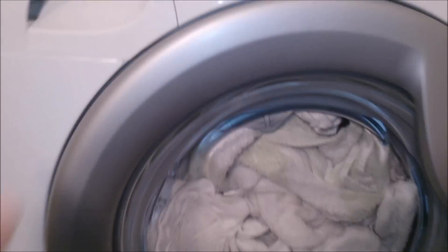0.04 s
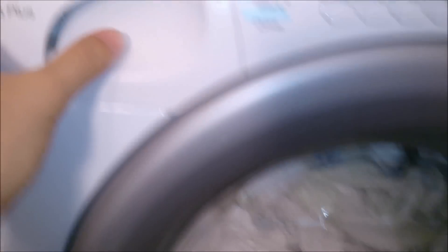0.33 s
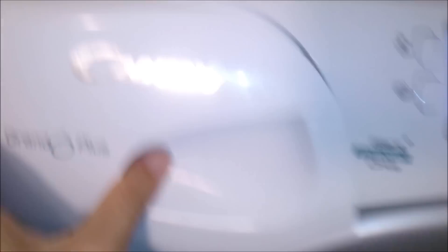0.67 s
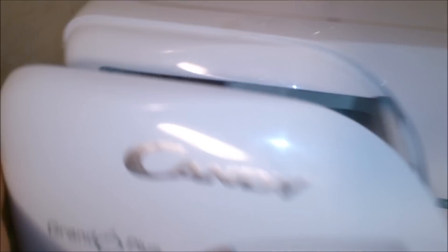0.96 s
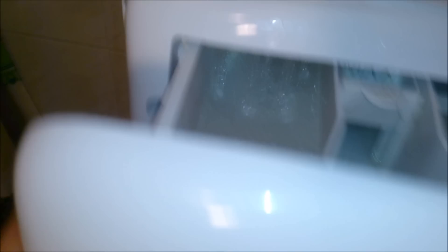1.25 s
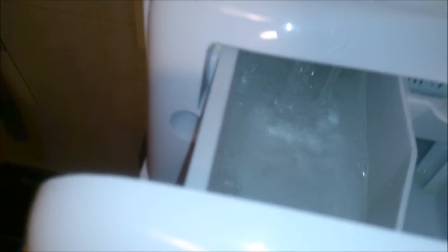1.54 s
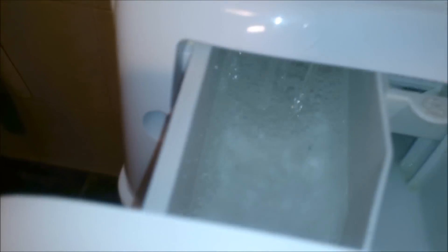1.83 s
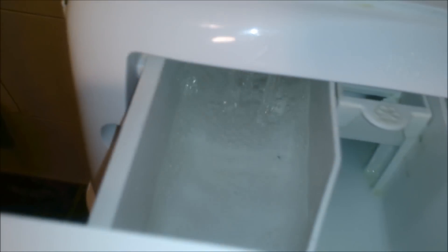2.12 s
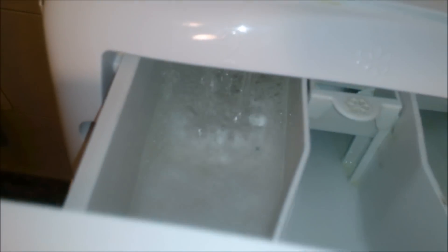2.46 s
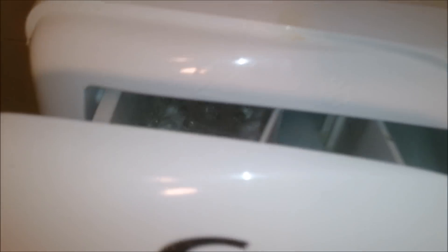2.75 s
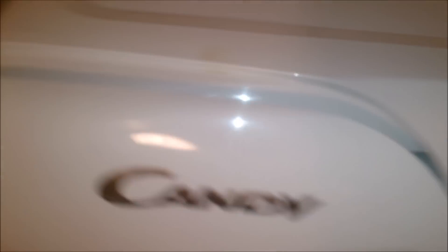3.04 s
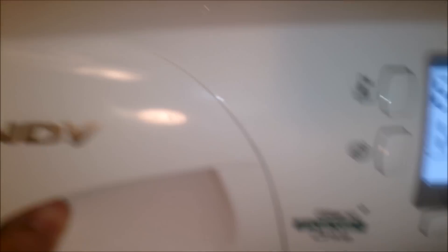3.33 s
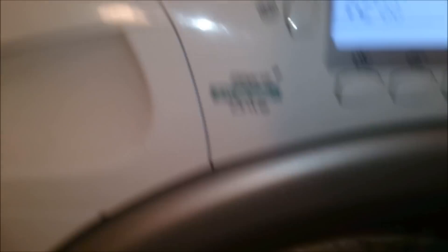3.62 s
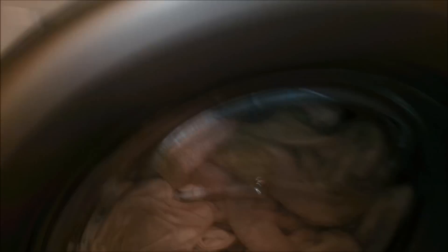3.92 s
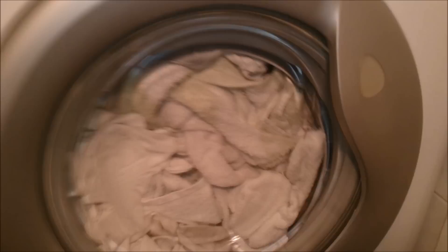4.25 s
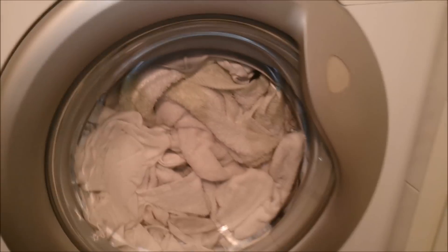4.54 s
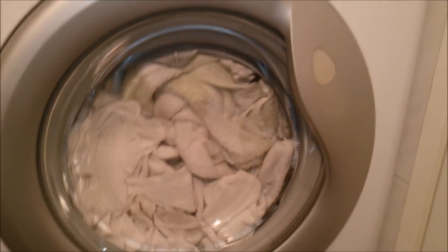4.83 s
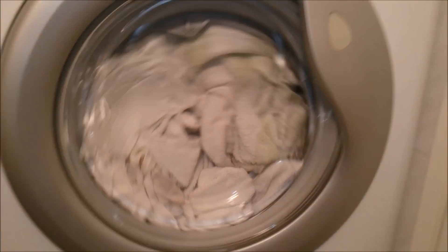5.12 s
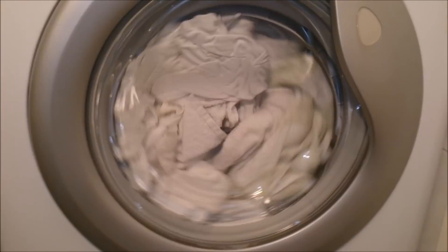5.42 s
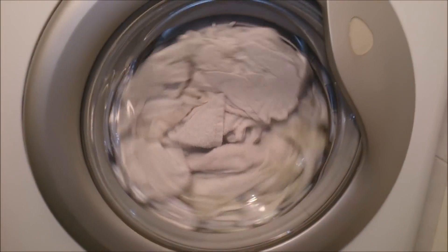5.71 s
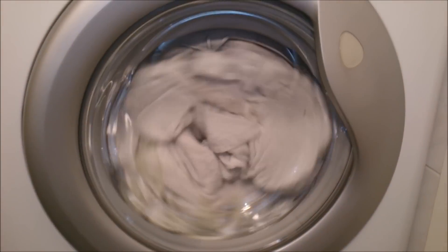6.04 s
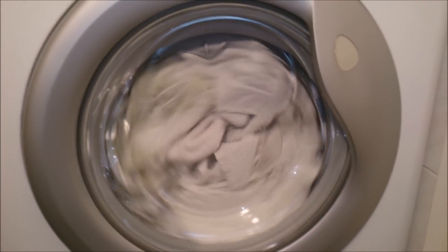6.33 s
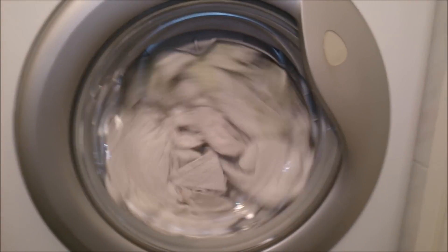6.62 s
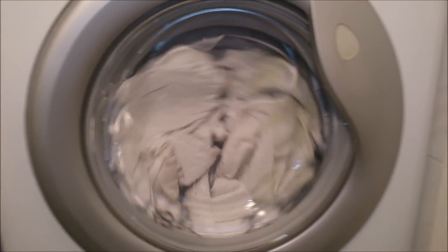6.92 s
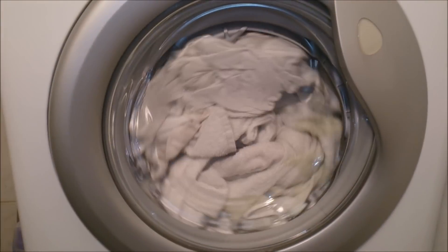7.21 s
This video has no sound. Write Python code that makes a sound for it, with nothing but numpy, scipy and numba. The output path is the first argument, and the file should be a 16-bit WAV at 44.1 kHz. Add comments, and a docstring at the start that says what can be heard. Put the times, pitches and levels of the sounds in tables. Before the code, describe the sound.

Close by in a small tiled room, water rushes into a washing machine over a faint hum. The plastic detergent drawer scrapes open, and the jets become a bright hiss, splashing and gurgling in the tray. The drawer slides back and shuts with a sharp clack. The water then cuts off with a knock in the pipe, a few drops fall, and wet laundry tumbles very quietly with soft thumps and sloshes.

```python
"""Water rushes behind a washing machine's front panel, over a faint valve hum, close by in a small tiled room.
The detergent drawer scrapes open: jets spatter on plastic and churn the pool until it shuts with a clack.
The inlet valve closes, the stopped water knocks the pipe, and the last drops plink and drain away.
Then the drum tumbles wet laundry, which rumbles, thumps the panels and spills water into the tub."""
import sys
import numpy as np
from scipy import signal
from scipy.fft import rfft, irfft, next_fast_len
from scipy.io import wavfile
from scipy.ndimage import uniform_filter1d
from numba import njit

SR = 44100
rng = np.random.default_rng(int(sys.argv[2]) if len(sys.argv) > 2 else 0)


def digitize_waveform(pressure):
    """Quantize a signal to 16-bit integers and store it at the path in sys.argv[1].

    Rows of a 2-D input are taken as channels; values are limited to [-1, 1].
    """
    field = np.atleast_2d(pressure).T
    bounded = np.clip(field, -1, 1)
    quanta = np.round(bounded * 32767).astype(np.int16)
    wavfile.write(sys.argv[1], SR, quanta)


N = 329427
T = np.arange(N) / SR
HZ = np.fft.rfftfreq(2 * N, 1 / SR) + .001
TOP_HZ = 15800
PAN_SHUT_DB, PAN_OPEN_DB, PAN_DRUM_DB = -2.5, 2.5, -3  # left minus right
PLUNGE_START_S, PLUNGE_END_S, PLUNGE_RAMP_S = 1.968, 2.715, 0.045


def open_drawer():
    """Water heard through the drawer gap; near full travel the jets plunge straight into the pool."""
    gap = opening()
    plunge = ramp(PLUNGE_START_S, PLUNGE_RAMP_S) - ramp(PLUNGE_END_S - PLUNGE_RAMP_S, PLUNGE_RAMP_S)
    # treble needs a wide gap, bass does not
    water = spray() * gap ** 1.034 + sizzle(plunge) * gap ** 2.7
    water += splash(gap, plunge) * gap ** .35 + gurgle() * gap ** 0.23
    water += crater() * plunge
    return water * sides(undb(PAN_SHUT_DB + (PAN_OPEN_DB - PAN_SHUT_DB) * gap))


# Drawer path. Each row: time in seconds, share of full travel.
DRAWER_TRAVEL = [(.75, 0), (.88, 0.34), (1.15, 0.43), (1.48, 0.76), (2.03, 0.97), (2.64, 0.93),
                 (2.86, 0.64), (3.25, 0.32), (3.45, 0.18)]

def opening():
    """How far the hand has drawn the drawer out, 0 to 1."""
    times_s, travel = np.transpose(DRAWER_TRAVEL)
    return np.interp(T, times_s, travel) * (T > times_s[0]) * (T < times_s[-1])


# Spray spectrum. Each row: frequency in Hz, gain in dB.
SPRAY_SPECTRUM = [(1060, -33), (1800, -3.5), (2470, -2.5), (2680, -1.5), (4120, -4), (5210, -1),
                  (6180, -1.5), (6950, 3), (8320, -2), (10600, -6), (15500, -20)]
# Spray and sizzle balance. Each row: frequency in Hz, left minus right in dB.
SPRAY_PAN = [(4000, 2), (7200, 2.5), (8500, 2), (11000, 8.5), (15000, 12)]

def spray():
    """Jets spatter on the plastic tray."""
    spatter = drops(per_s=7000, spread_db=1.5)
    spatter += undb(-12.5) * bubbles(4000, 10000, cycles=47, count=5000)
    spatter = room(spatter, wet_db=-2.5, t60_s=0.12)
    hiss = unit(filtered(spatter, shape(SPRAY_SPECTRUM) * sides(shape(SPRAY_PAN))))
    return hiss * undb(-33.5 + walk(per_s=25))


# Finest bubbles. Each row: centre in Hz, width in Hz, gain in dB.
SIZZLE_BAND = [(10070, 2400, 0)]

def sizzle(plunge, foam_lag_s=.012):
    """Fine bubbles burst in the pool; foam builds and collapses more slowly than the plunge."""
    fizz = bubbles(8000, 14000, cycles=38, count=9000)
    fizz = unit(filtered(fizz, resonances(SIZZLE_BAND) * sides(shape(SPRAY_PAN))))
    foam = uniform_filter1d(plunge, int(2 * foam_lag_s * SR))
    return fizz * undb(-47.5 + 9.5 * foam + 3.1 * walk(per_s=30))


# Water-loaded tray. Each row: centre in Hz, width in Hz, gain in dB.
TRAY_MODES = [(663, 6.7, -2.5), (960, 64.3, -10.5), (1090, 83, -12.5), (1250, 84, -13), (1449, 64, 0)]

def splash(gap, plunge):
    """The churning pool rings the tray and its air, whose pitch rises as the tray slides in."""
    churn = drops(per_s=7000, spread_db=2)
    churn = ports(churn + undb(-14.5) * bubbles(496, 2000, cycles=28, count=2500))
    air_hz = 849 + 169.7 * (1 - gap)
    air = np.array([moving_band(side, air_hz, width_hz=48.4) for side in churn])
    ring = unit(undb(2.5) * air + filtered(churn, resonances(TRAY_MODES)))
    return ring * undb(-42 + 6.5 * plunge + 1.5 * walk(per_s=14))


# Low resonances of the pool. Each row: centre in Hz, width in Hz, gain in dB.
POOL_MODES = [(291, 33, 0.5), (356, 17, 3.5), (439, 39, 6.5), (570, 20, -4.5)]
# Gulps as the drawer jerks. Each row: time in seconds, boost in dB.
POOL_GULPS = [(1.874, 10.5), (3.14, 11)]

def gurgle():
    """The pool rings hollowly and swells briefly at each gulp."""
    hollow = resonances(POOL_MODES) * shape([(190, -19.5), (280, 6.5), (600, -3.5), (1500, -15)])
    gulps_db = sum(db * swell(s, width_s=0.014) for s, db in POOL_GULPS)
    ring = unit(filtered(ports(drops(per_s=2500, spread_db=2)), hollow))
    return ring * undb(-45.5 + gulps_db + 2.5 * walk(per_s=12))


# Air dragged under by the jets. Each row: centre in Hz, width in Hz, gain in dB.
CRATER_AIR_MODES = [(863.5, 22, 9), (1100, 57, 3.5), (1234, 110, -5), (1485, 70, -3)]

def crater():
    """The jets dig a hollow in the pool; its air rings, wobbling in pitch and louder as it deepens."""
    churn = ports(drops(per_s=3000, spread_db=2))
    ring = 0
    for hz, width_hz, db in CRATER_AIR_MODES:
        pitch_hz = hz * (1 + 0.011 * walk(per_s=22))
        ring += undb(db) * np.array([moving_band(side, pitch_hz, float(width_hz)) for side in churn])
    return unit(ring) * undb(-35 - 1.5 * (2 - ramp(PLUNGE_START_S, 0.42)))


# Rush through the dispenser housing. Each row: frequency in Hz, gain in dB.
HOUSING_SPECTRUM = [(35, -40), (60, -9.5), (96, -3.5), (129, -9.5), (248, -6.5), (327, -8.5), (829, -6),
                    (999, -12.5), (1150, -7.5), (2250, -11), (2650, -12), (5450, -16), (7200, -16),
                    (10400, -17), (15500, -32)]
# Housing resonances. Each row: centre in Hz, width in Hz, gain in dB.
HOUSING_PEAKS = [(835, 87, -0.5), (1178, 464, -5.5), (2710, 210, -3.5), (3212, 540, -5.5),
                 (7000, 460, -4.5)]
# Housing balance. Each row: frequency in Hz, left minus right in dB.
HOUSING_PAN = [(100, -7), (700, 0.5), (3000, -3), (8000, -0.5), (12000, 0)]
VALVE_S, SQUEEZE_S, SHUT_S, EMPTYING_DB_PER_S = 4.15, 0.015, 0.13, 42.5

def inlet():
    """Jets drum inside the dispenser; the valve coil hums at twice the mains rate until it lets go."""
    # the valve closes: a short hiss, a quick drop, then the hose runs empty
    squeeze, shut = ramp(VALVE_S - SQUEEZE_S, SQUEEZE_S), ramp(VALVE_S, SHUT_S)
    closing_db = 5 * (squeeze - shut) - 15.5 * shut - EMPTYING_DB_PER_S * since(VALVE_S + SHUT_S)
    flow_db = -44 + 2.5 * np.sqrt(opening()) + closing_db
    colour = shape(HOUSING_SPECTRUM) * (1 + resonances(HOUSING_PEAKS)) * sides(shape(HOUSING_PAN))
    rush = unit(filtered(ports(drops(per_s=16000, spread_db=0.5)), colour))
    hum = sine(100) * undb(-55 + 1.3 * walk(per_s=5)) * (1 - squeeze)
    return rush * undb(flow_db + 0.5 * walk(per_s=16)) + hum * undb([[-1.8], [1.8]])


# Handle, latch and valve. Each row: start in seconds, level in dB, relative panel ping in dB.
PLASTIC_CLICKS = [(0.514, -28, -1), (3.4463, -13.5, -2.5), (3.4498, -5.5, 1), (3.4508, -10.5, -2),
                  (3.4541, -14, -0.5), (4.149, -32, 0), (4.437, -53, -14)]
# Crack of hard plastic. Each row: frequency in Hz, gain in dB.
CLICK_SPECTRUM = [(300, -8), (1300, -3), (2100, -1), (3000, 1), (3800, -5.5), (5000, -2.5), (7300, -7),
                  (11000, -12), (15500, -24)]

def clicks():
    """Plastic snaps against plastic: a crack, a short ping of the front panel, and the room's echo."""
    out = np.zeros((2, N))
    grit = unit(filtered(ports(noise()), shape(CLICK_SPECTRUM)))
    walls = shape([(1000, -0.5), (3000, -2), (7000, -1), (13000, -10)])
    echo = unit(filtered(ports(noise()), shape(CLICK_SPECTRUM) * walls))
    ping = sine(3050, SR) * fade(0.0099)
    give = 1 - fade(.005)  # plastic yields a little before it snaps
    for k, (s, db, ping_db) in enumerate(PLASTIC_CLICKS):
        crack = undb(-4) * stretch(grit, k) * fade(0.018)
        tail = undb(-16) * stretch(echo, k) * fade(0.29)
        add(out, s, undb(db) * (crack + undb(ping_db) * ping + tail) * give)
    return out * undb([[-.3], [.3]])


# Cabinet panels. Each row: pitch in Hz, gain in dB, t60 in seconds.
PANEL_MODES = [(66, 3.5, 0.36), (96.2, -6.5, 0.43), (130, -9.5, 0.43), (155, -11.5, .25),
               (187.8, -6.5, 0.33), (248.7, -5.5, 0.66), (302, -4.5, 0.14), (330, -13, 0.25),
               (410, -11.5, 0.35), (483, -2.5, 0.38), (635, -5, 0.29), (729, -3, 0.47)]
# Blows by hand, drawer, pipe and falling laundry.
# Each row: start in seconds, level in dB, hardness in Hz, relative panel ring in dB.
CABINET_BLOWS = [(0.149, -30.5, 322.2, 3), (0.820, -20.5, 600, -10.5), (1.168, -32, 163.1, -4),
                 (1.866, -29, 850, -2), (3.305, -25, 255.8, 1.5), (3.451, -23, 477, 2),
                 (3.472, -23, 810, -2.5), (3.54, -28.5, 159.4, 2), (4.150, -31, 1820, -0.5),
                 (4.164, -28.5, 892, -2), (4.177, -28.5, 697, -5), (4.215, -31, 214.8, 3.5),
                 (5.085, -58.5, 110, 4), (5.658, -46, 256, 3.5), (5.82, -49.5, 377, 3),
                 (5.908, -45.5, 520, -5), (6.115, -52, 150, 1), (6.21, -49.5, 179, 1),
                 (6.475, -50, 219.2, 5), (6.75, -46, 109, 5.5), (6.86, -46.5, 98.4, 7),
                 (7.331, -41.5, 300, 2.5)]

def blows():
    """Each blow shoves and rings the panels and shakes loose parts; soft ones boom, hard ones knock."""
    out = np.zeros((2, N))
    rattle = ports(noise())
    for k, (s, db, hard_hz, ring_db) in enumerate(CABINET_BLOWS):
        panels = 0
        for hz, mode_db, t60_s in PANEL_MODES:
            detuned_hz = hz * (1 + .01 * rng.standard_normal())
            panels += undb(mode_db) * fade(t60_s) * sine(detuned_hz, SR) * rng.choice([-1, 1])
        shake = stretch(rattle, k) * (fade(0.013) + undb(-1.5) * fade(.45))
        push = np.sin(np.pi * np.minimum(T[:SR] * hard_hz, 1))
        blow = push + undb(ring_db - 11.5) * panels + undb(3.5) * shake
        add(out, s, undb(db) * bandpass(blow, hard_hz / 5, hard_hz))
    low_cut = shape([(25, -28.5), (50, -17), (65, -2.5)])
    return filtered(out, low_cut * sides(shape([(100, -7.5), (400, -3.5)])))


# Scrapes. Each row: start, peak and end in seconds, squeak in dB, its pitch in Hz, shudder in dB.
DRAWER_SCRAPES = [(0.806, 0.878, 1.04, -45, 6840, -38.5), (3.28, 3.394, 3.48, -43, 4860, -42)]
# Grinding runners. Each row: centre in Hz, width in Hz, gain in dB.
GRIND_MODES = [(190.8, 110, 0), (290, 80, -1)]

def scrapes():
    """The drawer sticks and slips: the panel shudders, the runners grind and squeak where it binds."""
    slips = drops(per_s=2800, spread_db=2)
    shudder_hz = 70 * (1 + 0.11 * walk(per_s=40))
    shudder = np.sqrt(2) * np.sin(2 * np.pi * np.cumsum(shudder_hz) / SR)
    grind = undb(-10.5) * unit(filtered(ports(slips), resonances(GRIND_MODES) ** 2))
    out = np.zeros((2, N))
    for start_s, peak_s, end_s, squeak_db, hz, shudder_db in DRAWER_SCRAPES:
        force = np.interp(T, [start_s, peak_s, end_s], [0, 1, 0])
        squeak = unit(filtered(slips, resonances([(hz, 1300, 0)]) ** 2))
        out += undb(squeak_db) * squeak * force ** 2
        out += undb(shudder_db) * (shudder + grind) * force * sides(undb(PAN_SHUT_DB))
    return out


# Knocking pipe. Each row: centre in Hz, width in Hz, gain in dB.
KNOCK_MODES = [(267, 14, 0), (342.7, 40, -6), (481, 14, 2), (645, 22.7, -0.5), (738, 16, 5.5),
               (788.6, 41, -1), (3050, 650, -9)]
# Swinging hose. Each row: centre in Hz, width in Hz, gain in dB.
HOSE_MODES = [(186.4, 17, 0), (250, 16, 0), (290, 12, 0), (480.5, 11, 0)]

def water_hammer():
    """The stopped water column makes the hose judder against the cabinet, then swing itself out."""
    judder = ports(noise()) * np.interp(T, [4.132, 4.148, 4.176, 4.188], [0, 1, 1, 0])
    colour = resonances(KNOCK_MODES) * shape([(150, -14), (280, 1), (850, -4.5), (1500, -8)])
    knock = filtered(judder, colour)
    swing = unit(filtered(ports(noise()), resonances(HOSE_MODES) ** 2))
    swing *= ramp(4.176, 0.015) * decay(4.188, t60_s=0.68)
    return (undb(-28) * knock / np.abs(knock).max() + undb(-43.5) * swing) * undb([[-1], [1]])


# Single drops in tray, hose and tub.
# Each row: start in seconds, level in dB, pitch in Hz, ring in seconds, relative bubble level in dB.
LOUD_DRIPS = [(1.734, -22, 5150, 0.009, -1), (1.763, -26, 5540, 0.011, 0.5),
              (1.799, -20.5, 5600, .007, -6.5), (1.859, -13.5, 4900, .005, -14),
              (1.928, -17, 5700, .004, -10), (2.97, -34, 994, 0.081, 1), (3.18, -31.5, 974, 0.077, 1),
              (4.437, -57, 10340, .012, 2), (4.6, -61.5, 2510, 0.07, 0), (4.626, -61, 4930, .05, -8),
              (4.662, -62, 1330, 0.029, -3), (4.726, -62, 2800, 0.033, -8), (4.838, -65, 2900, .07, -7),
              (4.987, -69, 6940, 0.031, 0), (5.41, -72, 4520, 0.072, -9), (6.142, -69, 4600, 0.11, -10),
              (6.395, -65, 2520, 0.054, -3), (6.74, -64, 5550, .03, -8)]

def drips():
    """Each drop splashes as it lands and traps a small bubble."""
    out = np.zeros((2, N))
    for s, db, hz, ring_s, bubble_db in LOUD_DRIPS + dribble(count=28):
        plink = bubble(hz, cycles=hz * ring_s, glide=0.04)
        splat = bandpass(rng.standard_normal((2, len(plink))), hz * 0.78, min(hz * 1.28, TOP_HZ))
        splat *= fade(ring_s, len(plink))
        add(out, s, undb(db) * (undb(bubble_db) * plink + undb(4.5) * splat))
    return room(out, wet_db=-1, t60_s=0.39)


def dribble(count, start_s=3.7, length_s=1.6, low_hz=1300, high_hz=6700, ring_s=0.015, bubble_db=-4):
    """Drip rows for the hose, which dribbles ever more seldom and more faintly."""
    jitter, size, pitch = rng.random((count, 3)).T
    age = ((np.arange(count) + jitter) / count) ** 3.3
    db = -65 - 2.5 * age + 4 * (2 * size - 1)
    hz = low_hz * (high_hz / low_hz) ** pitch
    return [(*drop, ring_s, bubble_db) for drop in zip(start_s + length_s * age, db, hz)]


# Water shed by lifted laundry. Each row: peak time in seconds, level in dB.
LAUNDRY_SURGES = [(6.39, -71.5), (6.66, -75)]
DRUM_START_S, SPIN_UP_S, DRUM_STOP_S, COAST_S = 5.06, 1, 7.09, 0.16

def drum():
    """The drum speeds up, turns and coasts to a stop; the laundry it lifts sheds water in surges."""
    coast = ramp(DRUM_STOP_S - COAST_S, COAST_S)
    speed = ramp(DRUM_START_S, SPIN_UP_S) - coast
    shed = sum(undb(db) * swell(s, width_s=np.where(T < s, 0.18, 0.47)) for s, db in LAUNDRY_SURGES)
    tub = rumble(speed, coast) + trickle(shed, coast) + slop(shed)
    return tub * ramp(4.3, 0.22) * sides(undb(PAN_DRUM_DB))


# Rolling laundry. Each row: frequency in Hz, gain in dB.
RUMBLE_SPECTRUM = [(35, -41), (60, 4), (100, 4.5), (157, -8), (215, -2), (250, -8.5), (287, -8), (422, -11),
                   (629, -8), (794, -12.5), (1130, -15.5), (1600, -28), (2080, -61), (3520, -120)]
# Tub wall and the air inside. Each row: centre in Hz, width in Hz, gain in dB.
TUB_PEAKS = [(223.6, 10.4, 5.5), (289, 15, 3.5), (370, 13, 0), (503, 30, 5), (642, 15, 5), (773, 23, 7)]

def rumble(speed, coast, rest_db=-80.5, roll_db=-66, sag_db=-71):
    """Water rocks in the still tub; wet laundry rolls with the drum and sags as it stops."""
    colour = shape(RUMBLE_SPECTRUM) * (1 + resonances(TUB_PEAKS))
    thuds = unit(filtered(ports(drops(per_s=2000, spread_db=-0.5)), colour))
    gain = undb(rest_db) + undb(roll_db) * speed + undb(sag_db) * coast
    return thuds * gain * undb(2 * walk(per_s=18))


# Water running into the tub. Each row: frequency in Hz, gain in dB.
TRICKLE_SPECTRUM = [(500, 0), (900, 2), (1500, -8.5), (2100, -7), (3000, -10), (4800, -16), (7100, -16.5),
                    (8400, -19), (11000, -17), (13000, -32)]
DRAIN_S, DRAIN_DB_PER_S, TOPPLE_S = 4.28, 31.5, 5.68

def trickle(shed, coast):
    """The last water drains and thins to a steady trickle; more runs out of the toppled laundry."""
    draining = undb(-85.5) + undb(-68 - DRAIN_DB_PER_S * since(DRAIN_S))
    wrung = (undb(-85) * ramp(TOPPLE_S, .05) + shed) * (1 - coast)
    water = drops(per_s=2000, spread_db=2.5) + undb(-23) * bubbles(1270, 7000, cycles=9.1, count=1500)
    water = unit(filtered(room(water, wet_db=7, t60_s=0.32), shape(TRICKLE_SPECTRUM)))
    return water * (draining + wrung) * undb(walk(per_s=20))


# Water slopping in the tub. Each row: centre in Hz, width in Hz, gain in dB.
SLOP_MODES = [(490, 120, 1), (715, 330, 6)]

def slop(shed, lag_s=0.046):
    """Shed water slops below, just after each surge."""
    water = unit(filtered(ports(drops(per_s=600, spread_db=2)), resonances(SLOP_MODES) ** 2))
    return water * undb(-2.5) * np.interp(T - lag_s, T, shed)


# Spills. Each row: start in seconds, level in dB, pitch in Hz, rise in seconds, t60 in seconds.
TUB_SPILLS = [(4.575, -67.5, 1150, .012, .3), (4.78, -67, 1500, .012, 0.2), (6.05, -66.5, 720, 0.017, .4),
              (6.28, -73, 2180, 0.13, 2.2), (6.59, -66, 1650, .035, 1.1), (6.615, -61.5, 750, .012, .3),
              (6.655, -63, 516, 0.038, .4), (6.82, -69, 910, .1, 0.83), (7.16, -60.5, 950, .022, .3)]

def sloshes():
    """Water spills into the tub: a burst of drops rings a broad band, swells and dies away."""
    out = np.zeros((2, N))
    burst = ports(drops(per_s=3000, spread_db=0))
    for k, (s, db, hz, rise_s, t60_s) in enumerate(TUB_SPILLS):
        spill = unit(bandpass(np.roll(burst, k * SR, axis=1), hz * 0.76, hz * 1.12))
        out += undb(db) * spill * ramp(s, rise_s) * decay(s + rise_s, t60_s)
    return out * sides(undb(PAN_DRUM_DB))


# Room background. Each row: frequency in Hz, gain in dB.
AIR_SPECTRUM = [(12, -30.5), (20, 12), (107, -14.5), (161, -29), (696, -17.5), (2170, -23.5), (2630, -23.5),
                (4900, -30), (6970, -30.5), (11400, -28.5), (13000, -42)]

def room_air():
    """The still air of the room: faint, steady, mostly low noise."""
    air = unit(filtered(ports(noise()), shape(AIR_SPECTRUM)))
    return air * undb(-70 + 0.5) * undb([[-2.5], [2.5]])


def room(x, wet_db, t60_s):
    """Direct sound plus the dense echo of close tiled walls."""
    onset = np.clip(T[:SR] / 0.0016 - .5, 0, 1)
    tail = ports(noise())[:, :SR] * fade(t60_s) * onset
    tail /= np.sqrt(np.sum(tail[0] ** 2))
    return x + undb(wet_db) * signal.fftconvolve(x, tail, axes=1)[:, :N]


def drops(per_s, spread_db):
    """Random impacts of uneven size, scattered differently to each port."""
    size = undb(spread_db * np.minimum(rng.exponential(size=N), 5))
    return unit((rng.random(N) < per_s / SR) * size * noise())


def bubble(hz, cycles, glide):
    """A ringing air pocket whose pitch rises as it nears the surface."""
    age = np.arange(int(cycles * SR / hz)) * hz / (cycles * SR)
    return np.sin(2 * np.pi * cycles * age * (1 + glide * age / 2)) * np.exp(-np.log(300) * age)


def bubbles(low_hz, high_hz, cycles, count):
    """A swarm of bubbles of mixed sizes, a few much louder than the rest."""
    out = np.zeros((2, N))
    for when, pitch, size, side in rng.random((count, 4)):
        gain = np.sqrt(np.array([[side], [1 - side]]) / (size + 0.026))
        hz = low_hz * (high_hz / low_hz) ** pitch
        add(out, when * N / SR, gain * bubble(hz, cycles, glide=0.18))
    return unit(out)


def ports(pair, alike_hz=900, lag_ms=0.24):
    """Two microphone ports hear long waves alike, the right one a little later."""
    alike = .97 / np.sqrt(1 + (HZ / alike_hz) ** 4)
    shared = filtered(pair[0], alike * np.exp(-2j * np.pi * HZ * lag_ms / 1000))
    return np.array([pair[0], shared + filtered(pair[1], np.sqrt(1 - alike ** 2))])


def undb(db):
    """Decibels to gain."""
    return 10 ** (np.asarray(db) / 20)


def unit(x):
    """Scale to rms 1."""
    return x / np.sqrt(np.mean(x ** 2))


def sides(ratio):
    """Left and right gains for a left-to-right ratio."""
    return np.vstack([ratio ** .5, ratio ** -.5])


def shape(points):
    """Gain over frequency from (Hz, dB) points."""
    hz, db = np.transpose(points)
    return undb(np.interp(np.log(HZ), np.log(hz), db))


def resonances(modes):
    """Response of parallel (Hz, width Hz, dB) resonances."""
    return sum(undb(db) / (1 + 1j * (HZ ** 2 - hz ** 2) / (HZ * width)) for hz, width, db in modes)


def filtered(x, response):
    """Pass a sound through a frequency response."""
    size = next_fast_len(N + SR // 2, True)
    bins = np.round(np.arange(size // 2 + 1) * 2 * N / size).astype(int)
    return irfft(rfft(x, size) * response[..., bins], size)[..., :N]


def bandpass(x, low_hz, high_hz):
    """Band-pass with gentle slopes."""
    return signal.sosfilt(signal.butter(2, [low_hz, high_hz], "bandpass", fs=SR, output="sos"), x)


@njit
def moving_band(x, hz, width_hz):
    """State-variable band-pass with a moving centre."""
    y, band_state, low_state = np.empty(len(x)), 0., 0.
    for i in range(len(x)):
        g, damping = np.tan(np.pi * hz[i] / SR), width_hz / hz[i]
        band = (band_state + g * (x[i] - low_state)) / (1 + g * (g + damping))
        band_state, low_state = 2 * band - band_state, low_state + 2 * g * band
        y[i] = damping * band
    return y


def sine(hz, samples=N):
    """A steady tone."""
    return np.sin(2 * np.pi * hz * T[:samples])


def noise():
    """Two unrelated white noises."""
    return rng.standard_normal((2, N))


def stretch(pair, k):
    """One second of a stereo noise, from another place for each k."""
    return np.roll(pair, k * SR // 4, axis=1)[:, :SR]


def walk(per_s):
    """Smooth random drift, rms 1."""
    hold = SR // per_s
    steps = np.repeat(rng.standard_normal(N // hold + 1), hold)
    return unit(uniform_filter1d(uniform_filter1d(steps, hold), hold)[:N])


def since(s):
    """Seconds elapsed after time s."""
    return np.maximum(T - s, 0)


def ramp(start_s, length_s):
    """Rise from 0 to 1."""
    return np.clip((T - start_s) / length_s, 0, 1)


def swell(s, width_s):
    """A smooth rise and fall around time s."""
    return np.exp(-((T - s) / width_s) ** 2)


def fade(t60_s, samples=SR):
    """Exponential decay of a short sound."""
    return np.exp(-np.log(1000) * T[:samples] / t60_s)


def decay(s, t60_s):
    """Hold at 1 until time s, then die away."""
    return np.exp(-np.log(1000) * since(s) / t60_s)


def add(track, s, sound):
    """Mix a sound into a track at time s."""
    i = int(np.clip(s * SR, 0, N - 1))
    track[..., i:i + sound.shape[-1]] += sound[..., :N - i]


def scene():
    """The machine over the still air of the room."""
    filling = inlet() + open_drawer()
    mechanics = blows() + clicks() + scrapes() + water_hammer()
    return filling + mechanics + drips() + sloshes() + drum() + room_air()


# Microphone port balance. Each row: frequency in Hz, left minus right in dB.
PORT_PAN = [(4500, 0), (7200, -6.5), (8500, 0.5), (10800, 7.5), (14000, 0.5)]

def record(dry):
    """The two microphone ports resonate at different pitches; a steep low-pass cuts the top."""
    heard = filtered(dry, sides(shape(PORT_PAN)))
    return signal.sosfilt(signal.ellip(10, .2, 80, TOP_HZ, fs=SR, output="sos"), heard)


dry = scene()
out = record(dry)
digitize_waveform(out)
```